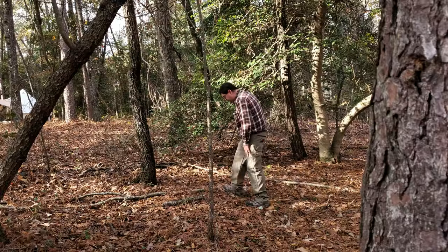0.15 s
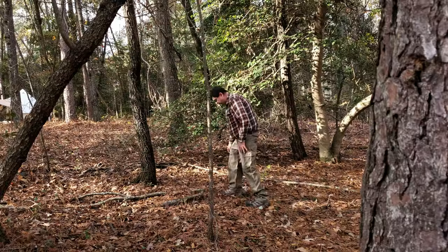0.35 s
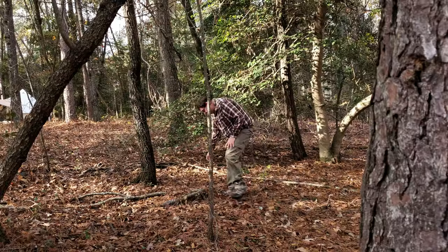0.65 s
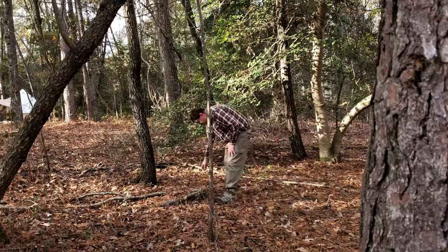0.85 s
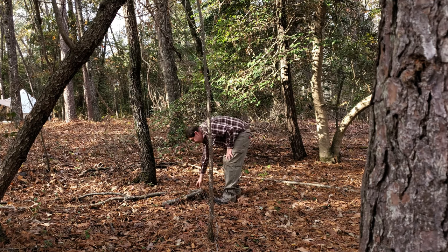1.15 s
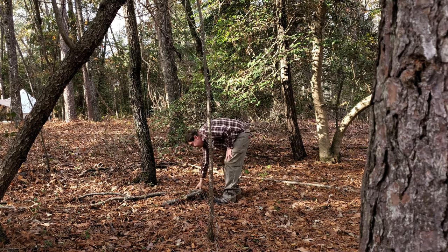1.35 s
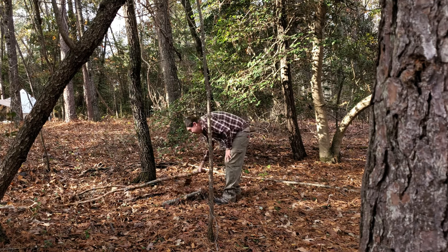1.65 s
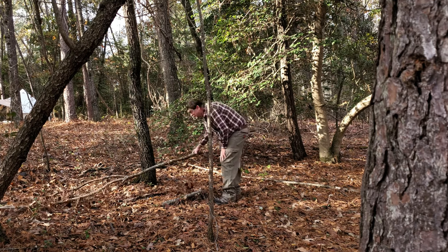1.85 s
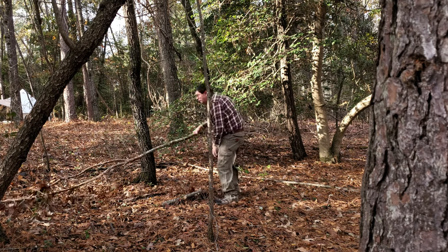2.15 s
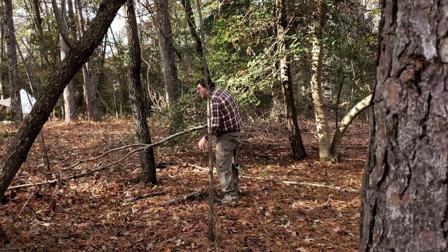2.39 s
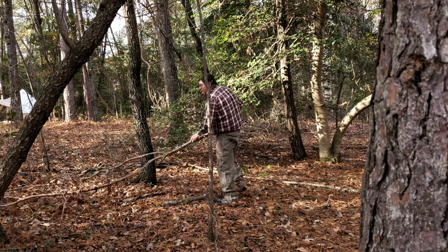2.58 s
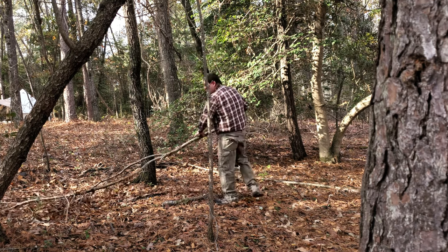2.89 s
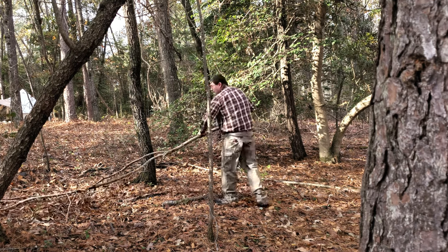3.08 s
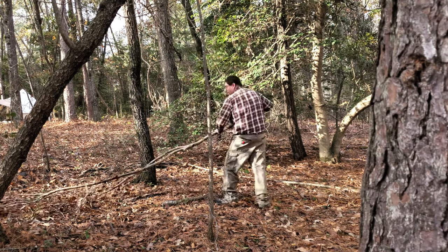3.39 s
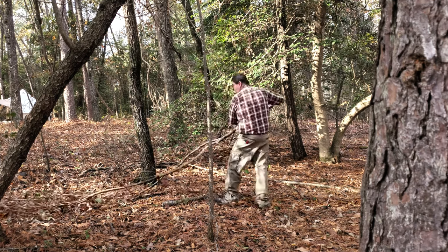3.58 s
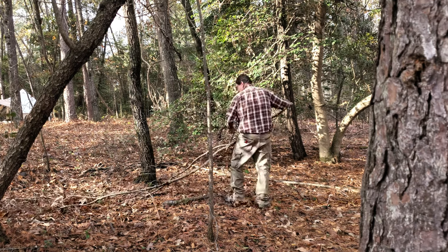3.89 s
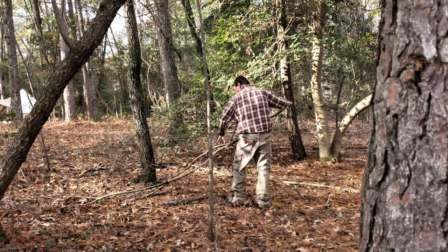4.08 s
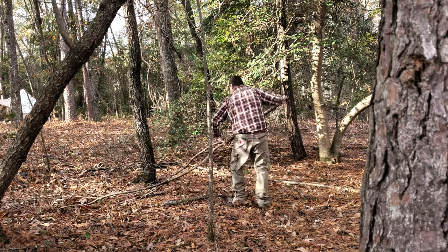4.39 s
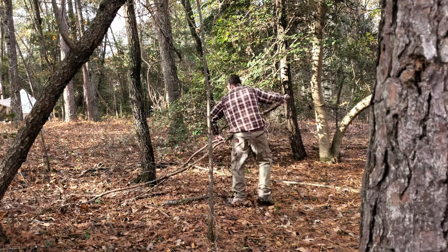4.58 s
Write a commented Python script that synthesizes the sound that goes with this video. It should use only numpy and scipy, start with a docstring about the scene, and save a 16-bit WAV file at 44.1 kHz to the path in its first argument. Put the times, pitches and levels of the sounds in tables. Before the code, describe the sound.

Boots crunch over dry leaves and pine needles for the first second, with several twig snaps, the sharpest at about 0.5 seconds. A distant bird gives four short, faint, partly hoarse calls between 0.3 and 2 seconds. From about 1.4 seconds a dead branch stirs softly in the leaves, then is dragged in a dense, crisp crackle from 2 to 2.8 seconds, with a brief rasp midway and a sharp snap at the end. A second pull builds from 3.1 seconds, peaks around 3.5 and quickly dies away. From 3.8 seconds, lighter steps and small snaps trail off until about 4.7 seconds. Faint wind continues throughout, and a far engine's low hum swells gently near 0.5, 2.6 and 3.7 seconds. The woodland is heard in stereo, the branch slightly to the left, each crackle scattering briefly off the trunks.

```python
"""A dead branch is hauled in two pulls over dry leaves and pine needles, which crackle as they break.
The man dragging it takes a few steps before and after; twigs snap under his boots and on the branch.
Tree trunks scatter every crackle. Far off, a bird calls four times and an engine swells and fades
over faint wind. Two microphones, set a little apart, hear it as left and right."""
import sys
import numpy as np
from scipy import signal
from scipy.fft import rfft, irfft
from scipy.io import wavfile
from scipy.ndimage import map_coordinates

SR = 44100
rng = np.random.default_rng(int(sys.argv[2]) if len(sys.argv) > 2 else 0)


def pcm_store(signal):
    """Save signal as 16-bit PCM."""
    levels = np.round(np.clip(np.atleast_2d(signal), -1, 1) * 32767)
    wavfile.write(sys.argv[1], SR, levels.astype(np.int16).T)


N = 209034
TIME = np.arange(N) / SR
HZ = np.fft.rfftfreq(N, 1 / SR)

# Tugs on the branch: (start [s], build-up [s], hold [s], level [dB], crispness [dB], right delay [ms])
TUGS = [(1.413, 0.13, 0.11, -59.5, 2, .045), (1.623, .08, 0.26, -60, 0, 0.21),
        (1.878, 0.088, 0.053, -53.5, -1, 0.18), (2.061, .29, 0.11, -41.5, 1.5, 0.22),
        (2.461, 0.078, 0.23, -43.5, 0.3, 0.27), (2.919, 0.057, 0.047, -55.5, -1.5, 0.286),
        (3.075, 0.39, 0.11, -41, 1.5, 0.31), (3.459, 0.098, 0.053, -38, 1.5, .19)]
# Tone of the dragging: (frequency [Hz], left level [dB], right level [dB])
BRANCH_TONE = [(89, -5, -14), (250, -6.5, -8), (494, -8, -11), (1090, -8.5, -9.5), (1500, -1.5, -5.5),
               (2020, -2, -3), (3000, 4.5, 0.5), (3980, 4, 2), (5130, -1, 3), (6100, -2, 1.5),
               (7600, -5.5, -11.5), (7760, -3, -13.5), (10300, -4, -10.5), (15600, -8.5, -13.5)]


def branch(level_db=-1.46, crush_db=-10, build_db_per_s=46.5, coast_db_per_s=95):
    """The branch rakes through leaves on the left; each tug takes up slack, builds, holds and coasts."""
    slack_s, ease_off_s = 0.062, 0.11
    crackles = crackle(per_s=16000, spread_db=2.5, clump_db=.7, patch_db=2.6,
                       ticks_per_s=200, ticks_db=-11.5)
    start, build_up, hold, db, crisp_db, delay_ms = np.transpose(TUGS)[..., None]
    age = TIME - start
    early_s = np.maximum(build_up - age, 0)
    coasting_s = np.hypot(np.maximum(age - build_up - hold, 0), ease_off_s) - ease_off_s
    tug_db = level_db + db - build_db_per_s * early_s - coast_db_per_s * coasting_s
    tugs = ease(age / slack_s) * amp(tug_db) + 1e-12
    body = tugs.max(0)
    crisp = (tugs * amp(crisp_db)).max(0)
    # the sound comes from wherever the branch rubs hardest
    weight = (tugs / body) ** 8
    place_ms = (weight * delay_ms).sum(0) / weight.sum(0)
    return stiff_twig(leaves(crackles, BRANCH_TONE, place_ms, body, body * amp(crush_db), crisp))


# A rasp in the first pull: (time [s], half length [s], pitch [Hz], pitch width [Hz], boost [dB])
TWIG_RASP = (2.39, 0.074, 3700, 800, 3.6)


def stiff_twig(pair):
    """While a stiff twig digs in, the crackle makes it ring."""
    time, half_s, hz, width_hz, boost_db = TWIG_RASP
    ringing = irfft(rfft(pair) / (1 + (2 * (HZ - hz) / width_hz) ** 2), N)
    digging = np.exp(-((TIME - time) / half_s) ** 2 / 2)
    return pair + ringing * (amp(boost_db * digging) - 1)


def crackle(per_s, spread_db, clump_db, patch_db, ticks_per_s, ticks_db):
    """Countless tiny cracks each make a scrap of leaf ring briefly; needles break with sharp ticks."""
    out, t = np.zeros(N), np.arange(400) / SR
    for hz in np.geomspace(500, 15000, num=30):
        strength = amp(spread_db * np.minimum(rng.exponential(1, N), 4.5)) * rng.choice([-1, 1], N)
        clicks = strength * (rng.random(N) < per_s / 30 / SR)
        clicks *= amp(patch_db * wander(41))  # each leaf gives a short run of cracks near its own pitch
        scrap = np.exp(-t * hz / 2) * np.sin(2 * np.pi * hz * t)
        out += unit(signal.oaconvolve(clicks, scrap)[:N]) * np.sqrt(hz)
    breaks = amp(5.1 * np.minimum(rng.exponential(1, N), 3)) * (rng.random(N) < ticks_per_s / SR)
    ticks = signal.oaconvolve(breaks, np.exp(-t / 0.00079))[:N] * rng.standard_normal(N)
    clumps = unit(out * amp(clump_db * wander(47)))
    return unit(clumps + amp(ticks_db) * unit(ticks))


def leaves(crackles, tone, delay_ms, body_gain, crush_gain, crisp_gain, echo_db=1):
    """Crackle and its echo off the trunks, split into a low crush, a middle body and a crisp top."""
    right = map_coordinates(crackles, [np.arange(N) - delay_ms * SR / 1000], order=5)
    pair = np.array([crackles, right]) + amp(echo_db) * echo_hiss(crackles, fade_s=.13)
    spectrum = rfft(pair) * tone_gains(tone)
    low = 1 / (1 + (HZ / 1300) ** 4)
    high = 1 / (1 + (7300 / (HZ + 1)) ** 8)
    crush, body, crisp = (unit(irfft(spectrum * band, N)) for band in (low, 1 - low - high, high))
    return body_gain * body + crush_gain * crush + crisp_gain * crisp


# Steps and scuffs: (start [s], roll [s], hold [s], level [dB], low crush [dB], crispness [dB])
FOOTSTEPS = [(0.122, 0.065, 0.053, -51.5, -9, 1.5), (.23, 0.056, 0.062, -60, -6, -3),
             (0.35, 0.031, 0.067, -53.5, -8, 2), (0.496, 0.021, 0.013, -47, -27, 3),
             (0.539, 0.081, 0.1, -53.5, -12, 2), (0.671, 0.094, 0.11, -50.5, -6, 2.5),
             (0.764, 0.018, 0.0093, -47.5, -21, 4.5), (0.924, 0.074, 0.5, -69.5, -7, 0),
             (3.802, 0.068, 0.2, -54, -17, 0), (3.92, .015, 0.014, -48, -8.5, 3),
             (3.97, 0.049, 0.0089, -57.5, -18, -1), (4.068, 0.13, 0.088, -60, -21, -0.5),
             (4.277, 0.063, 0.16, -63.5, -19, 2), (4.476, 0.15, 0.083, -61.5, -26, 0.5)]
# Tone of the steps: (frequency [Hz], left level [dB], right level [dB])
BOOT_TONE = [(89, -7, -33), (258, 3, 2), (493, -6, -6.5), (1040, -4.5, -10.5), (1530, -1, -5.5),
             (2180, -3.5, -7), (3200, 2, -2), (4120, -2.5, -3.5), (5430, -9, 1), (5770, -4.5, 0.5),
             (7200, -7.5, -12), (8100, -5, -11.5), (10600, -3.5, -7.5), (15300, -8, -8.5)]


def boots(level_db=-1.5, settle_db_per_s=156, delay_ms=-0.027):
    """Each sole rolls onto the leaves and presses them; they fall quiet once the weight is on the foot."""
    crackles = crackle(per_s=11000, spread_db=1, clump_db=.5, patch_db=2, ticks_per_s=84, ticks_db=-9)
    start, roll, hold, db, crush_db, crisp_db = np.transpose(FOOTSTEPS)[..., None]
    settling_s = np.maximum(TIME - start - roll - hold, 0)
    press = ease((TIME - start) / roll) * amp(level_db + db - settle_db_per_s * settling_s)
    crush, crisp = together(press * amp(crush_db)), together(press * amp(crisp_db))
    return leaves(crackles, BOOT_TONE, delay_ms, together(press), crush, crisp)


# Breaking twigs: (time [s], level [dB], pitch [Hz], knock [dB], crispness [dB], right delay [ms])
TWIG_SNAPS = [(.1410, -45, 3500, -16, -1, -.02), (.3686, -40, 1500, -3, -3, -.02),
              (.4657, -36.5, 2100, -4, -2, -.02), (.5131, -28.8, 1820, 3.5, -8, -.01),
              (.7805, -44, 5000, -12, -2, -.02), (.8797, -46, 9000, -12, 2, -.02),
              (1.3252, -56, 3300, -16, -6, 0), (2.0282, -48.5, 2400, -14, -12, .1),
              (2.1329, -37.5, 8500, -20, 2.5, .16), (2.3614, -42, 4000, -14, 1, .27),
              (2.7764, -32.5, 1300, -18, 1, .16), (3.3457, -41, 10000, -16, 1, .25),
              (3.4654, -37, 6300, -14, -7, .29), (3.9383, -41, 5800, -9, -3, -.02),
              (4.1344, -59.5, 5000, -12, 2, 0), (4.4173, -55, 4200, -14, -5, -.02),
              (4.6602, -51, 1600, -18, -1, -.02)]
# Notes a twig rings at: (multiple of its pitch, boost [dB])
TWIG_NOTES = [(1, 3.5), (1.36, 3), (1.83, 1.5), (2.45, 3), (3.3, 2)]


def twigs(echo_db=-10, knock_hz=340, size=1024):
    """Each snap is a quick run of tearing fibres, a low knock as the stick gives way, then its echo."""
    direct = np.zeros((2, N))
    t, hz = np.arange(size) / SR, np.fft.rfftfreq(size, 1 / SR)
    swing = 2 * np.pi * knock_hz * (t - .0023)
    knock = rfft(-swing * np.exp(-swing ** 2 / 2))
    for time, db, pitch_hz, knock_db, crisp_db, delay_ms in TWIG_SNAPS:
        tear_ms = 1.7 * (1000 / pitch_hz) ** .4  # thick, low twigs take longer to tear
        fibres = rng.choice([-1, 1], size) * np.exp(-(t * 1000 / tear_ms) ** 2)
        tear = amp(26) * rfft(fibres / np.linalg.norm(fibres))
        octaves = np.log2((hz + 50) / pitch_hz)
        tone_db = sum(boost * np.exp(-(octaves - np.log2(k)) ** 2 / .02) for k, boost in TWIG_NOTES)
        tone_db += 7 * np.minimum(octaves, 0)  # a twig gives off little below its lowest note
        treble = [(5800, 0), (7200, crisp_db / 2 - 3), (9000, crisp_db), (16000, crisp_db - 4)]
        tone_db += curve(treble, hz)
        # turn that tone into the brief ring of damp wood
        log_gain = np.log(amp(np.r_[tone_db, tone_db[-2:0:-1]]))
        wood = np.exp(np.conj(signal.hilbert(log_gain)))[:len(hz)]
        snap = amp(db) * (tear * wood + amp(knock_db) * knock)
        # a twig further left reaches the left microphone both sooner and louder
        pan_db = 3 + 23 * delay_ms
        left = snap * amp(pan_db / 2)
        right = snap * amp(-pan_db / 2) * np.exp(-2j * np.pi * hz * delay_ms / 1000)
        add(direct, time, irfft([left, right]))
    return direct + amp(echo_db) * spaced(trunk_echoes(direct[0], fade_s=0.13))


# Bird calls: (start [s], length [s], top pitch [Hz], level [dB], hoarseness [0-1])
BIRD_CALLS = [(.26, .09, 1582, -59, 0.4), (.65, .105, 1610, -55.5, .2), (1.191, 0.1, 1510, -62.5, .8),
              (1.85, 0.1, 1530, -65.5, .9)]


def bird(rasp_hz=85, arch=.16, echo_db=-7):
    """Short calls from deep in the wood: the pitch rises fast and falls more slowly, rasping if hoarse."""
    out, jitter = np.zeros(N), wander(185)
    rasp = np.sin(2 * np.pi * np.cumsum(rasp_hz * (1 + 0.276 * wander(41))) / SR)
    for start, length, top_hz, db, hoarse in BIRD_CALLS:
        progress = np.clip((TIME - start) / length, 0, 1)
        hz = top_hz * (1 - arch * (2 * progress ** .8 - 1) ** 2 + .025 * hoarse * jitter)
        swell = np.sin(np.pi * progress).clip(0) ** (1 / 4) * (progress < 1)
        out += amp(db) * swell * (1 + hoarse * rasp) * np.sin(2 * np.pi * np.cumsum(hz) / SR)
    return out + amp(echo_db) * trunk_echoes(out, fade_s=1.0)


# Engine swells: (loudest time [s], half length [s], low notes [dB], high notes [dB], rumble [dB])
ENGINE_SWELLS = [(.55, 0.58, -53, -66.5, -63), (2.62, 0.48, -52.5, -65.5, -57),
                 (3.65, 0.69, -56, -59.5, -55.5)]
# The engine's low and high notes: (multiple of the shaft speed, level [dB])
LOW_NOTES = [(4, -4), (5, 1)]
HIGH_NOTES = [(7, -1.5), (8, -8)]
# Steady hum of far machinery: (pitch [Hz], level [dB])
MACHINE_HUM = [(68, -66.5), (101, -70), (114.3, -60.5)]


def engine(waver_db=3, drift=0.01372, high_width=0.82, rumble_hz=69, rumble_width_hz=41):
    """Only a far engine's deep notes and exhaust rumble carry through the trees, wavering on the way."""
    time, half_s, low_db, high_db, rumble_db = np.transpose(ENGINE_SWELLS)[..., None]
    swell = np.exp(-((TIME - time) / half_s) ** 2 / 2)
    low = together(amp(low_db) * swell)
    high = together(amp(high_db) * swell ** (1 / high_width ** 2))  # only near the top of a swell
    shaft_hz = 21.06 + 0.2015 * np.maximum(TIME - 2.097, 0)  # steady at first, then slowly faster
    notes = [(k * shaft_hz, low * amp(db)) for k, db in LOW_NOTES]
    notes += [(k * shaft_hz, high * amp(db)) for k, db in HIGH_NOTES]
    notes += [(hz, amp(db)) for hz, db in MACHINE_HUM]
    out = np.zeros(N)
    for hz, gain in notes:
        turns = np.cumsum(hz * (1 + drift * wander(6.54))) / SR + rng.random()
        out += np.sqrt(2) * gain * amp(waver_db * wander(5.1)) * np.sin(2 * np.pi * turns)
    band = 1 / (1 + (2 * (HZ - rumble_hz) / rumble_width_hz) ** 4)
    rumble = unit(irfft(rfft(rng.standard_normal(N)) * band, N))
    return out + together(amp(rumble_db) * swell) * rumble


# Tone of the background air: (frequency [Hz], left level [dB], right level [dB])
AIR_TONE = [(15, -25, -37), (37.8, 19.5, 0), (57, 23, 24), (120.6, 25.5, 25), (136, 8.5, 5.5), (223, 6, 6),
            (447, 3, 3), (817, 1.5, -1), (950, -5.5, -8.5), (2260, -10, -12.5), (3560, -4.5, -10),
            (5130, -16, -9.5), (7440, -19, -25), (15300, -21, -25)]


def air(level_db=-54, swell_db=.5):
    """Distant rumble and faint wind in the pines; a light breeze brushes each microphone on its own."""
    far = rfft(spaced(rng.standard_normal((2, N)), blend_hz=400))
    breeze_db = curve([(25, -23), (70, -15), (180, -8), (600, -3)], HZ)
    breeze = rfft(rng.standard_normal((2, N))) * amp(breeze_db)
    wind = unit(irfft((far + breeze) * tone_gains(AIR_TONE), N))
    return amp(level_db + swell_db * wander(0.7)) * wind


def echo_hiss(crackles, fade_s):
    """Every crack lies somewhere else, so their echoes merge into a hiss that trails the crackle."""
    decay = np.exp(-2 * np.log(1000) / (fade_s * SR))
    power = signal.lfilter([1 - decay], [1, -decay], crackles ** 2)
    return spaced(np.sqrt(power) * rng.standard_normal((2, N)))


def trunk_echoes(sound, fade_s, size=20000):
    """Scattered echoes off ground and trunks, different on each side, falling 60 dB in fade_s."""
    t = np.arange(size) / SR
    echoes = rng.standard_normal((2, size)) * (rng.random((2, size)) < 1 / 10)
    echoes *= amp(-60 * t / fade_s) * (t > .003)
    echoes /= np.linalg.norm(echoes, axis=1, keepdims=True)
    return signal.fftconvolve(sound[None], echoes, axes=1)[:, :N]


def spaced(pair, blend_hz=520):
    """Low sounds reach both microphones alike; high ones stay apart."""
    left, right = rfft(pair)
    blend = np.pi / 4 / (1 + (HZ / blend_hz) ** 2)
    own, other = np.cos(blend), np.sin(blend)
    return irfft([left * own + right * other, right * own + left * other], N)


def tone_gains(tone):
    """Left and right gain at every frequency."""
    rows = np.array(tone)
    return amp([curve(rows[:, [0, 1]], HZ), curve(rows[:, [0, 2]], HZ)])


def curve(points, hz):
    """Joins (frequency [Hz], value) points with lines, giving each octave equal room."""
    point_hz, value = np.transpose(points)
    return np.interp(np.log(hz + 1), np.log(point_hz + 1), value)


def wander(rate_hz, size=8192):
    """Smooth random motion, mostly slower than rate_hz."""
    hz = np.fft.rfftfreq(size, TIME[-1] / size)
    slow = irfft(rfft(rng.standard_normal(size)) / (1 + (hz / rate_hz) ** 4))
    return unit(np.interp(TIME, np.linspace(0, TIME[-1], size), slow))


def amp(db):
    """Turns decibels into a gain to multiply by."""
    return 10 ** (np.asarray(db) / 20)


def unit(x):
    """Scales a signal to an average power of 1."""
    return x / np.sqrt(np.mean(x ** 2) + 1e-20)


def ease(progress):
    """Smooth rise from 0 to 1."""
    return np.sin(np.pi / 2 * np.clip(progress, 0, 1)) ** 2


def together(gains):
    """Joint gain of overlapping sounds: their powers add."""
    return np.sqrt(np.sum(np.square(gains), axis=0))


def add(mix, start_s, sound):
    """Mixes a sound in at start_s."""
    part = mix[..., max(round(start_s * SR), 0):][..., :sound.shape[-1]]
    part += sound[..., :part.shape[-1]]


def scene():
    """The man and his branch against the quiet wood."""
    return boots() + branch() + twigs() + bird() + engine() + air()


def record(dry):
    """Cuts the highest treble, above 15900 Hz."""
    treble_cut = signal.firwin(511, 15900, window=("kaiser", 9), fs=SR)
    return signal.oaconvolve(dry, treble_cut[None], "same")


dry = scene()
out = record(dry)
pcm_store(out)
```